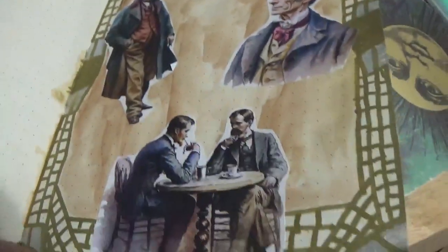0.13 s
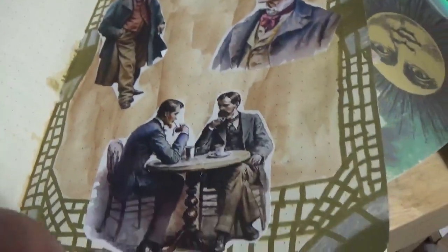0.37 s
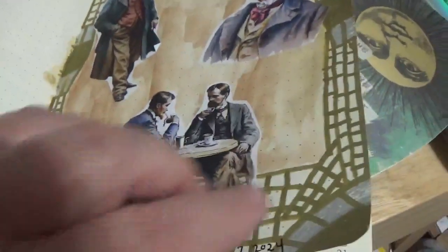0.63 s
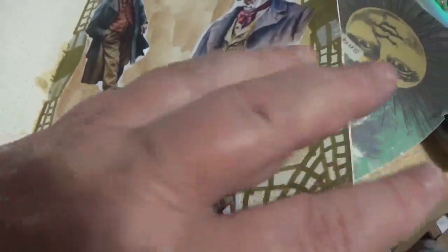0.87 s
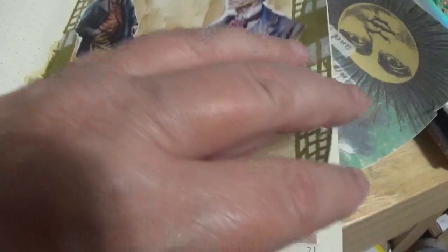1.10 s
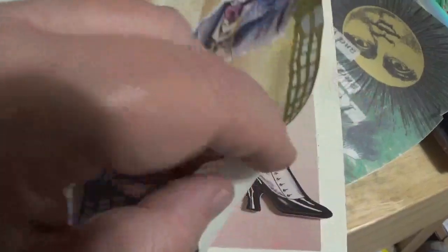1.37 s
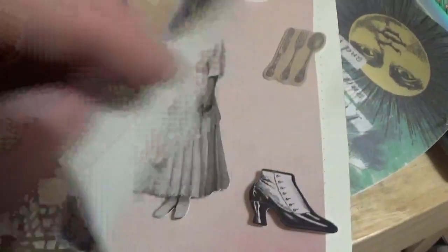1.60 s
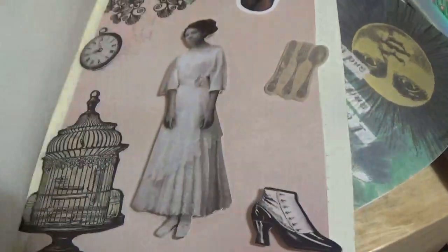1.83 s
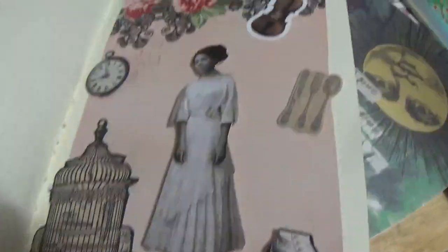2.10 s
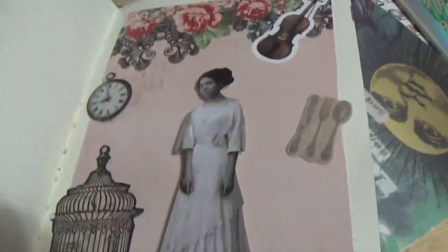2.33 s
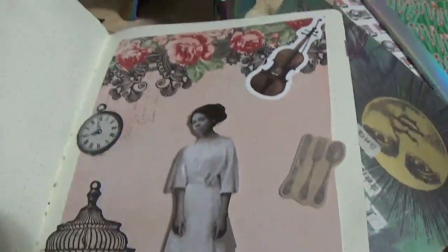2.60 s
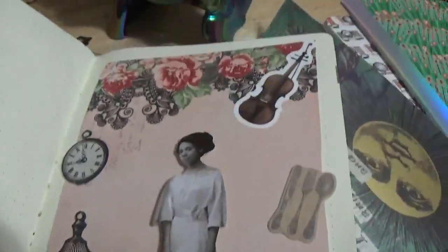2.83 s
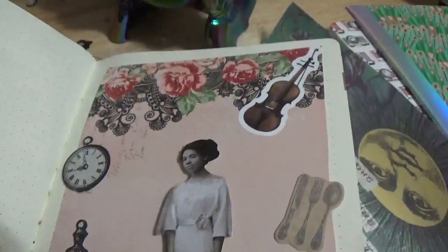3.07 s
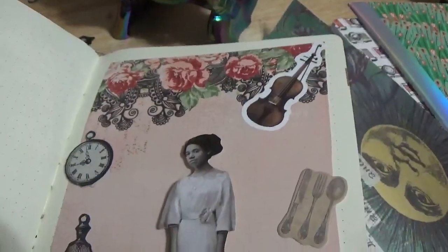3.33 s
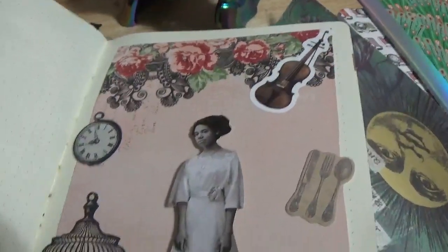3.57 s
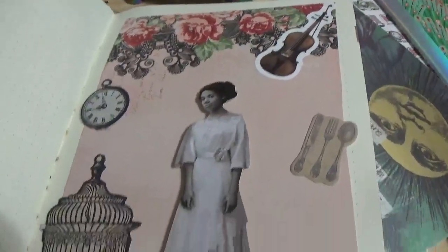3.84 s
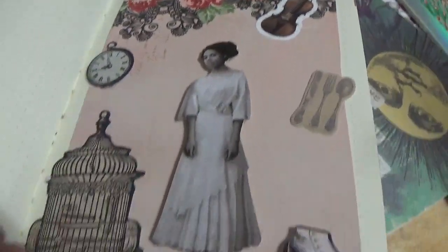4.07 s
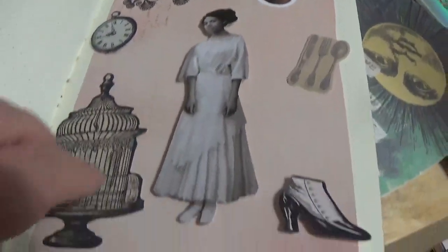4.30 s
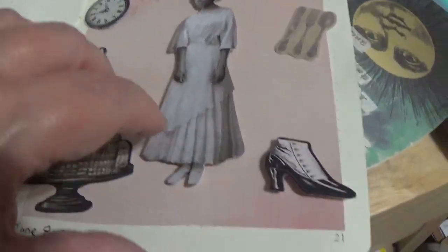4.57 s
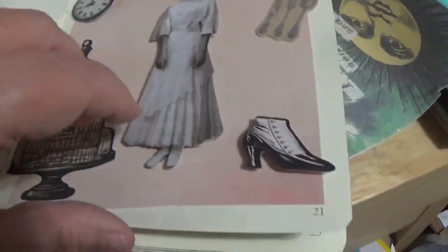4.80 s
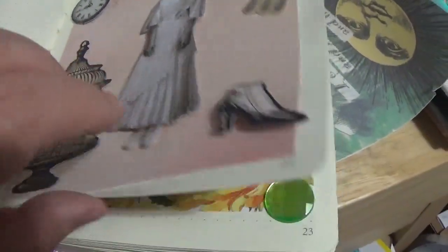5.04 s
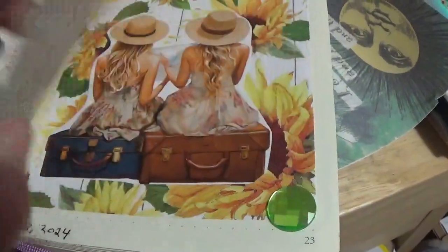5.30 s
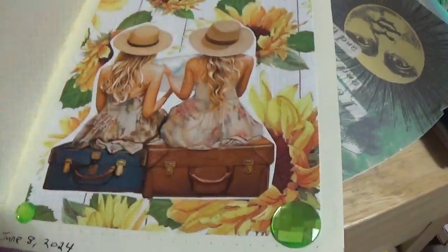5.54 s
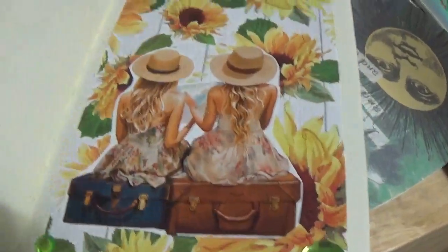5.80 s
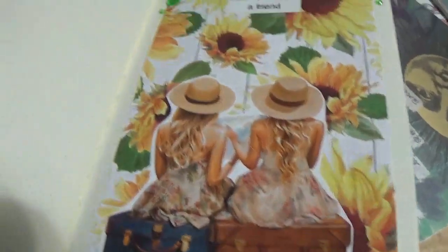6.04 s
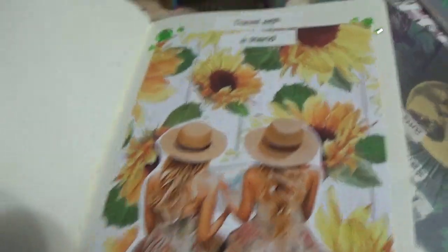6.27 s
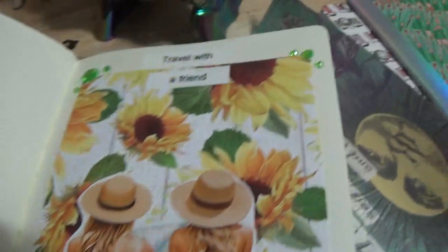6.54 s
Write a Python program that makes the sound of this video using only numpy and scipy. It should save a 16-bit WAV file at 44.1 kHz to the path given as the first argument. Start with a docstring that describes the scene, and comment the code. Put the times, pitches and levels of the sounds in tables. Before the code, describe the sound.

Fingers drag across stiff journal pages, then a thick sheet is turned with sharp crackling snaps, followed by faint slides and light ticks indoors.

```python
"""A quiet room, microphones close by: room air, a low hum and a camera's ticking run from start to end.
From one second fingers drag over a thick journal's stiff pages, to the left: noise slips make the hiss.
Then a sheet snaps sharply as it is turned, each snap a run of kicks into the pages' decaying modes.
A slow slide follows, and after a lull come short faint drags, light ticks and more slides.
Nearby surfaces return short echoes of the paper."""
import sys
import numpy as np
from scipy import signal
from scipy.fft import rfft, irfft
from scipy.io import wavfile
from scipy.ndimage import uniform_filter1d

SR = 44100
rng = np.random.default_rng(int(sys.argv[2]) if len(sys.argv) > 2 else 0)


def ratio_of_db(decibels):
    """Turn decibels (scalar or array-like) into linear amplitude factors; 0 dB maps to 1."""
    return 10 ** (np.asarray(decibels, float) / 20)


def waveform_to_disk(signal):
    """Save audio, clipped to [-1, 1], as 16-bit WAV at the path in sys.argv[1]."""
    frames = np.transpose(np.atleast_2d(signal))
    scaled = np.clip(frames, -1, 1) * 32767
    samples = np.round(scaled).astype(np.int16)
    wavfile.write(sys.argv[1], SR, samples)


N = 293505

# Steady room noise, relative spectrum. Each row: frequency in Hz, density in dB per Hz.
AIR_SPECTRUM = [(12, -38), (20, -14.5), (66, -1.5), (168, -7), (286, -3), (461, -6.5), (513, -6), (687, -8),
                (2740, -15), (3210, -15.5), (3760, -18), (10600, -21.5), (11500, -24), (15000, -76),
                (22000, -120)]
AIR_DB = -62  # rms level ahead of the microphones' bass cut
# How alike the air is at the two microphones. Each row: frequency in Hz, correlation from 0 to 1.
AIR_LIKENESS = [(60, 0.99), (170, 0.85), (490, 0.47), (1390, 0.05), (3970, 0.38), (11300, 0.8)]
# Swells of the low hum. Each row: time in seconds, level in dB.
HUM_SWELLS = [(0.0, -72), (0.37, -69), (0.5, -91), (0.78, -70), (1.0, -74), (1.22, -70), (1.45, -75),
              (1.61, -67.5), (3.24, -65.5), (4.99, -76.5), (5.71, -68), (6.66, -69.5)]
TICKS_PER_S, FIRST_TICK_S = 29.97, 0.0275

# Echoes from close surfaces. Each row: frequency in Hz, time to fall 60 dB in seconds.
DESK_T60 = [(250, 0.39), (700, 0.19), (1500, 0.12), (4000, 0.081), (9000, 0.061)]
# How far the echoes differ between microphones. Each row: frequency in Hz, gain in dB.
ECHO_APART = [(200, -15.5), (1000, -6.5), (5000, 6.5)]
# The book lies to the left. Each row: frequency in Hz, left minus right in dB.
PAPER_LEFT_DB = [(60, 2.5), (170, -0.5), (490, 2), (1390, 4), (3970, 4), (11300, 1)]

# Skin on the paper's surface, relative spectrum. Each row: frequency in Hz, density in dB per Hz.
FIZZ_SPECTRUM = [(2500, -27.5), (4500, -9), (6000, -7.5), (8500, 2.5), (11000, -2.5)]
# The rubbed sheet, relative spectrum. Each row: frequency in Hz, density in dB per Hz.
SCRAPE_SPECTRUM = [(200, -9.5), (400, -6), (800, -8), (1500, -7.5), (2800, -5.5), (4500, -8.5),
                   (7000, -12.5), (11000, -89)]
# Bands where the rubbed sheet rings. Each row: centre in Hz, width in Hz, relative level in dB.
SHEET_RINGS = [(1400, 302, -12.5), (1910, 220, -14), (2800, 360, -10.5), (4110, 250, -21)]
# A raised page rings freely while it is dragged. Each row: time in seconds, level in dB.
LIFTED_PAGE = [(5.135, -85), (5.15, -66), (5.19, -66), (5.23, -75), (5.28, -73), (5.35, -77), (5.42, -85)]
# A fingertip or sheet catches, drags evenly and lets go.
# Each row: start in seconds, length in seconds, fizz in dB, scrape in dB, fizz change along the drag in dB.
PAGE_DRAGS = [(1.019, 0.012, -39.5, -66, -7.5), (1.177, 0.053, -50.5, -60, -3),
              (1.257, 0.094, -39, -58, 0.5), (1.372, .045, -62, -65.5, 2),
              (1.416, 0.058, -38.5, -53, -16.5), (1.553, 0.086, -44, -52, 1.5),
              (1.697, 0.086, -51.5, -52, -8.5), (1.751, .34, -66.5, -62, 4.5), (2.101, 0.099, -47, -49, -6),
              (3.801, 0.016, -62, -69, -4), (3.992, 0.25, -67, -67.5, 9), (4.25, 0.14, -72, -73.5, -3),
              (4.338, .012, -62, -72, 0), (4.372, .12, -57.5, -65.5, -6), (4.553, 0.04, -67.5, -62, 7),
              (4.597, 0.019, -62, -55.5, -1), (4.742, 0.031, -66, -67, -3), (5.04, .1, -73, -70, -5),
              (5.143, 0.039, -59.5, -60, -13), (5.194, 0.028, -57.5, -64, -6),
              (6.041, 0.1, -50, -59, -11.5)]
CATCH_S, LET_GO_DB_PER_S = 0.011, 900
SHEET_FOLLOWS = 0.37  # the scrape follows this share of the fizz's change along a drag
# A page edge whips past.
# Each row: peak in seconds, fizz in dB, scrape in dB, rise in seconds, fall in seconds.
EDGE_FLICKS = [(1.527, -54, -64.5, .08, .045), (1.66, -32.5, -42, 0.012, .028),
               (2.224, -23.5, -35, 0.011, 0.017), (2.237, -33.5, -35, 0.011, 0.052),
               (2.385, -45.5, -53, 0.17, 0.055), (5.723, -51, -56, 0.04, .03),
               (5.987, -48.5, -51.5, 0.065, 0.057)]
FLICK_SPAN_DB = 20  # rise and fall times cover this many dB
# A page slides slowly over the next, one list a slide. Each row: time in seconds, fizz in dB, scrape in dB.
PAGE_SLIDES = [
    [(2.426, -71, -68), (2.44, -50.5, -57.5), (2.566, -42.5, -55), (2.65, -47, -55), (2.798, -53, -58.5),
     (2.875, -69, -69)],
    [(5.225, -70, -71), (5.255, -54, -66), (5.31, -53.5, -64), (5.4, -60, -68), (5.5, -69, -70),
     (5.6, -80, -77)],
    [(5.6, -87, -82), (5.68, -70, -67.5), (5.76, -73, -76), (5.9, -59, -60.5), (5.96, -66, -61)],
    [(6.15, -70, -77), (6.26, -56, -63.5), (6.37, -51.5, -66.5), (6.48, -48.5, -66), (6.58, -51.5, -61),
     (6.66, -55.5, -64)],
]

# The sheet buckles. Each row: time in seconds, nominal peak in dB, pitch of the ring in Hz,
# thud in dB and crack in dB, both relative to the ring.
BUCKLES = [(1.026, -37, 3390, -11, 23), (1.06, -47.5, 696, -2, 15), (1.171, -45.5, 848, 0, 15),
           (1.643, -23, 2300, -9, 4), (1.654, -31.5, 2420, -10, 20), (1.657, -22.5, 1450, -7, 1.5),
           (1.676, -18.5, 1400, -8, -30), (1.758, -17.5, 2900, -10, -35), (1.79, -17.5, 1800, -7.5, -11),
           (1.802, -21, 1010, -0.5, -26), (1.869, -11.5, 1220, -10, -38), (1.973, -9, 1440, -21, -12),
           (2.04, -27.5, 1280, -26, 8.5), (2.106, -30, 1490, -18.5, -6), (2.141, -11, 1960, -21.5, -2.5),
           (2.222, -17.5, 3400, -29, -7), (2.233, -11.5, 2920, -30, -6), (2.236, -8, 1860, -30, 3),
           (2.25, -26, 1430, -18, -8), (2.382, -36, 3300, -17, 4), (2.627, -33, 3180, -23, 6),
           (2.718, -41, 1480, 5, 9), (2.779, -43.5, 3480, -6, 3), (2.796, -41, 1020, -3, 13),
           (3.003, -46, 1600, 4, 14), (3.084, -36.5, 1100, -2, -6), (3.982, -33.5, 1310, -1.5, -19),
           (4.001, -36, 1670, -17, -6), (4.605, -45, 2700, -10, -22), (5.048, -41.5, 2100, -12, 6),
           (5.144, -44.5, 2730, -4, 5), (5.202, -44, 2860, -6, -6), (5.351, -41, 900, 40, -5),
           (5.471, -29.5, 1035, -6, -38), (5.536, -47, 1220, -4, 9), (5.714, -36, 1490, -2, -17),
           (5.893, -40.5, 1310, -6, -6), (5.987, -32.5, 2880, 18, 27), (6.049, -35, 1780, 1, 4.5),
           (6.061, -35.5, 3480, 2, 24), (6.106, -42.5, 2580, 3, -3), (6.121, -43.5, 1520, -16, 3),
           (6.141, -38.5, 821, 13, 37)]
# How long the modes of the pages last. Each row: frequency in Hz, time to fall 60 dB in seconds.
PAGES_T60 = [(150, 0.025), (500, 0.037), (1200, 0.036), (2500, 0.021), (5000, 0.0044), (10000, 0.0028)]
# Shapes of a snap's thud and of its crack. Each row: frequency in Hz, relative level in dB.
THUD_SHAPE = [(120, -10), (300, -7.0), (550, -6.5), (1200, -32.0)]
CRACK_SHAPE = [(2500, -30.0), (5000, 1.5), (11500, -5.0)]


def unit_rms(x):
    """Scales to an rms of one."""
    return x / np.sqrt(np.mean(x ** 2) + 1e-20)


def read(points, hz):
    """Reads a table on a log-frequency axis."""
    f, value = np.transpose(points)
    return np.interp(np.log(hz + 1), np.log(f + 1), value)


def add(mix, s, sound):
    """Mixes a sound in at s seconds."""
    part = mix[round(s * SR):][:len(sound)]
    part += sound[:len(part)]


def high_pass(x, order, hz):
    """Takes away what lies below hz."""
    return signal.sosfilt(signal.butter(order, hz, "high", fs=SR, output="sos"), x)


def colour(x, points):
    """Filters by a spectrum in dB."""
    n = x.shape[-1]
    gain = ratio_of_db(read(points, np.fft.rfftfreq(n, 1 / SR)))
    return irfft(rfft(x) * gain, n)


def resonate(x, hz, width):
    """Shifts hz down to zero, smooths, and shifts back: a resonance of the given width in Hz."""
    turn = np.exp(2j * np.pi * np.cumsum(hz * np.ones(len(x))) / SR)
    r = np.exp(-np.pi * width / SR)
    smooth = signal.lfilter([1 - r], [1, -r], x / turn + 1e-18)
    return 2 * (turn * smooth).real


def air():
    """Steady room noise and microphone hiss, alike on both sides in the bass, with a thin whine."""
    hz = np.fft.rfftfreq(N, 1 / SR)
    left, other = rfft(rng.standard_normal((2, N)))
    same = np.clip(read(AIR_LIKENESS, hz), -1, 1)
    both = np.array([left, same * left + np.sqrt(1 - same ** 2) * other])
    hiss = unit_rms(irfft(both * ratio_of_db(read(AIR_SPECTRUM, hz)), N))
    whine = unit_rms(resonate(rng.standard_normal(N), 7870, 40))  # a thin tone from the electronics
    return ratio_of_db(AIR_DB) * hiss + ratio_of_db(-85.0) * whine


def hum():
    """A low drone that wavers in pitch and swells as the camera moves."""
    t = np.arange(N) / SR
    waver = sum(np.sin(2 * np.pi * (f * t + rng.random())) for f in np.geomspace(0.4, 5, 9))
    drone = np.sin(2 * np.pi * np.cumsum(58 + 0.84 * waver) / SR)
    return ratio_of_db(np.interp(t, *np.transpose(HUM_SWELLS))) * unit_rms(drone)


def camera_ticks():
    """A tiny drive steps once a frame; every other step is stronger and a little higher."""
    out, t = np.zeros(N), np.arange(400) / SR
    shape = t / 0.00081 * np.exp(1 - t / 0.0008)
    for k, s in enumerate(np.arange(FIRST_TICK_S, N / SR, 1 / TICKS_PER_S)):
        hz, db = (3300, -60) if k % 2 == 0 else (3130, -63)
        level = ratio_of_db(db + 1.1 * rng.standard_normal())
        add(out, s, level * shape * np.sin(2 * np.pi * hz * t))
    return out


def echoes(x):
    """Sparse taps of random sign, other ones for each microphone, each band dying at its own speed."""
    taps = np.zeros((2, SR // 4))
    at = np.arange(60, SR // 4 - 20, 20) + rng.integers(0, 20, (2, (SR // 4 - 61) // 20))
    np.put_along_axis(taps, at, rng.choice([-1., 1.], at.shape), 1)
    hz, t, z = signal.stft(taps, SR, nperseg=128)
    decay = ratio_of_db(-60 * t / read(DESK_T60, hz)[:, None])
    tail = signal.istft(z * decay, SR, nperseg=128)[1]
    return signal.fftconvolve(x[None], tail / np.linalg.norm(tail[0]), axes=1)[:, :N]


def contact():
    """Levels of fizz and scrape over time: the powers of all drags, flicks and slides add up."""
    t, power = np.arange(N) / SR, np.zeros((2, N))
    share = np.array([[1], [SHEET_FOLLOWS]])
    for start, length, fizz_db, scrape_db, change_db in PAGE_DRAGS:
        along = share * change_db * np.clip((t - start) / length, 0, 1)
        gone = LET_GO_DB_PER_S * np.maximum(t - start - length, 0)
        caught = np.clip((t - start) / CATCH_S, 0, 1)
        power += (caught * ratio_of_db([[fizz_db], [scrape_db]] + along - gone)) ** 2
    for peak, fizz_db, scrape_db, rise, fall in EDGE_FLICKS:
        away = np.maximum((peak - t) / rise, (t - peak) / fall)
        power += ratio_of_db([[fizz_db], [scrape_db]] - FLICK_SPAN_DB * away) ** 2
    for slide in PAGE_SLIDES:
        s, *columns = np.transpose(slide)
        power += ratio_of_db([np.interp(t, s, c, -200, -200) for c in columns]) ** 2
    return np.sqrt(power)


def rubbing():
    """Dense micro-slips of uneven size, clumped by the paper's grain, make fizz and shake the sheet."""
    fizz, scrape = contact()
    noise, clump = rng.standard_normal((2, N))
    slips = noise * ratio_of_db(2.0 * np.minimum(rng.exponential(1, N), 3.5))
    slips *= ratio_of_db(1.1 * unit_rms(uniform_filter1d(clump, 150)))
    # the bent sheet favours shifting bands
    z = signal.stft(slips, nperseg=256)[2]
    over_hz = uniform_filter1d(rng.standard_normal(z.shape), 4, 0)
    patches = unit_rms(uniform_filter1d(over_hz, 22, 1))
    slips = signal.istft(z * ratio_of_db(2.0 * patches), nperseg=256)[1][:N]
    rings = sum(ratio_of_db(db) * unit_rms(resonate(slips, hz, width)) for hz, width, db in SHEET_RINGS)
    sheet = unit_rms(colour(slips, SCRAPE_SPECTRUM)) + rings
    raised = ratio_of_db(np.interp(np.arange(N) / SR, *np.transpose(LIFTED_PAGE), -200, -200))
    skin = fizz * unit_rms(colour(slips, FIZZ_SPECTRUM))
    return skin + scrape * unit_rms(sheet) + raised * unit_rms(rings)


def snap(s, peak_db, ring_hz, thud_db, crack_db):
    """A run of quick buckles, more spread when strong, sets off the crowded modes of the pages."""
    t = np.arange(5000) / SR
    when, size, sign = rng.random((3, 7))
    length = 0.0045 * ratio_of_db(0.45 * (peak_db + 12))  # seconds
    kicks = np.zeros(600)
    at = np.clip(when * length * SR, 0, 599).astype(int)
    np.add.at(kicks, at, (1 - when / 2) * size * np.sign(sign - 0.5))
    kicks[0] = 1

    place, phase = rng.random((2, 72, 1))
    hz = 120 * (11500 / 120) ** ((np.arange(72)[:, None] + place) / 72)
    octaves = np.log2(hz / ring_hz)
    thud = ratio_of_db(read(THUD_SHAPE, hz) + thud_db)
    ring = ratio_of_db(np.minimum(17 * octaves, -11 * octaves))  # loudest at the pitch of the bent part
    crack = ratio_of_db(read(CRACK_SHAPE, hz) + crack_db)
    decay = ratio_of_db(-60 * t / read(PAGES_T60, hz))  # treble dies first
    # the modes start only partly in step
    modes = decay * np.sin(2 * np.pi * (hz * t + 0.65 * phase)) * np.minimum(t / 0.0001, 1)

    bright = high_pass(((ring + crack) * modes).sum(0), 2, 0.27 * ring_hz)
    soften = signal.butter(3, 650, fs=SR, output="sos")  # the thud has no edge
    dull = signal.sosfilt(soften, (thud * modes).sum(0))
    sound = signal.fftconvolve(kicks, bright + dull)[:len(t)]
    sound = high_pass(sound, 4, 110)  # a small sheet moves no deep bass
    crest_db = 8.5  # the nominal peak stands this far over the loudest 3 ms
    loudest = np.sqrt(uniform_filter1d(sound ** 2, 130).max())
    return s + 0.001, ratio_of_db(peak_db - crest_db) * sound / loudest


def scene():
    """Paper near and to the left, with its echoes, over the room and the camera."""
    paper = rubbing()
    for row in BUCKLES:
        add(paper, *snap(*row))
    tails = echoes(paper)
    alike = tails.mean(0)
    apart = colour(tails - alike, ECHO_APART)  # long waves reach both microphones alike
    wet = paper + ratio_of_db(-11) * (alike + apart)
    sides = []
    for k, side in enumerate((1, -1)):
        sides.append(colour(wet[k], [(hz, side * db / 2) for hz, db in PAPER_LEFT_DB]))
    ticks = camera_ticks() * np.array([[1], [-1]])  # opposite polarity at the two microphones
    return np.array(sides) + air() + hum() + ticks


def low_pass(x):
    """Removes everything above the highest recorded frequency."""
    return signal.sosfilt(signal.butter(12, 11920, fs=SR, output="sos"), x)


def record(dry):
    """The microphones drop the deepest bass, and a steep filter ends the treble near 11 kHz."""
    thin = high_pass(dry, 4, 45)
    band_limit = signal.firwin(401, 10990, window=("kaiser", 9), fs=SR)
    limited = signal.oaconvolve(thin, band_limit[None], "same")
    return low_pass(limited)


dry = scene()
out = record(dry)
waveform_to_disk(out)
```